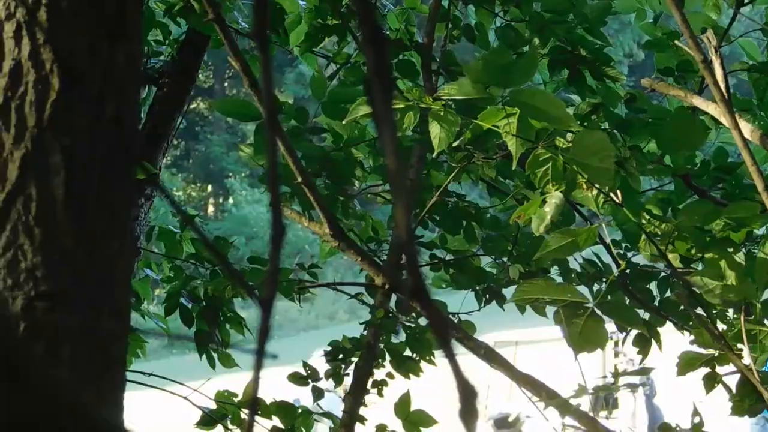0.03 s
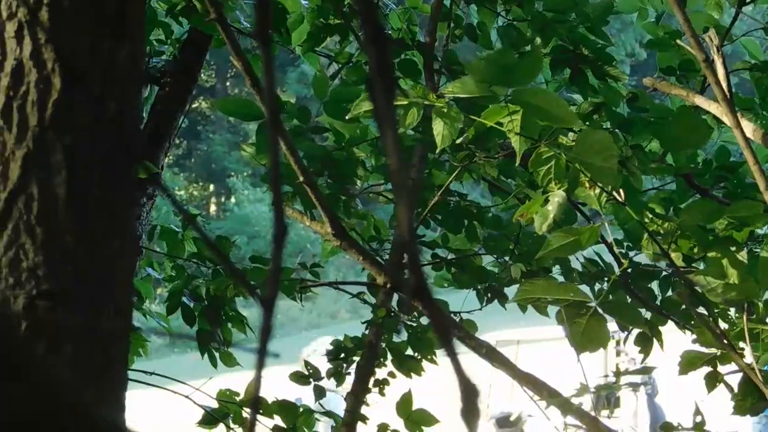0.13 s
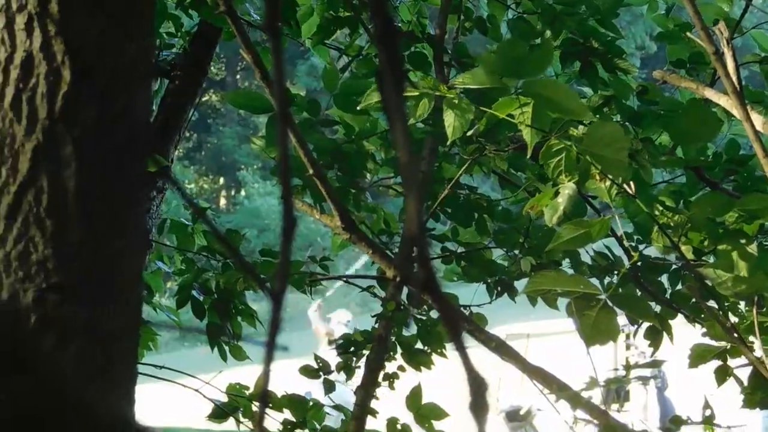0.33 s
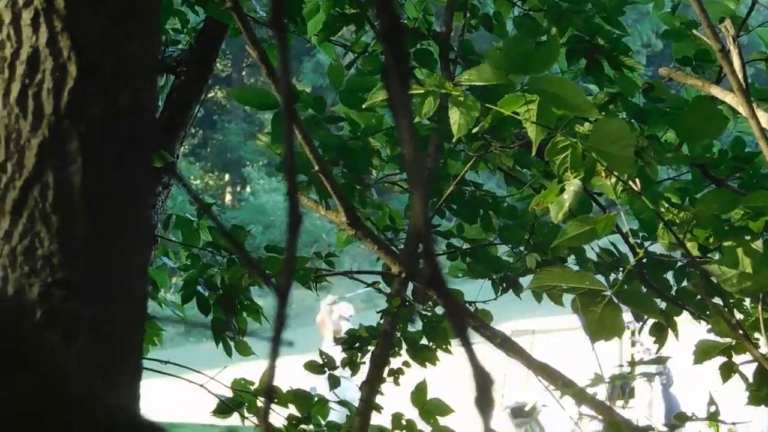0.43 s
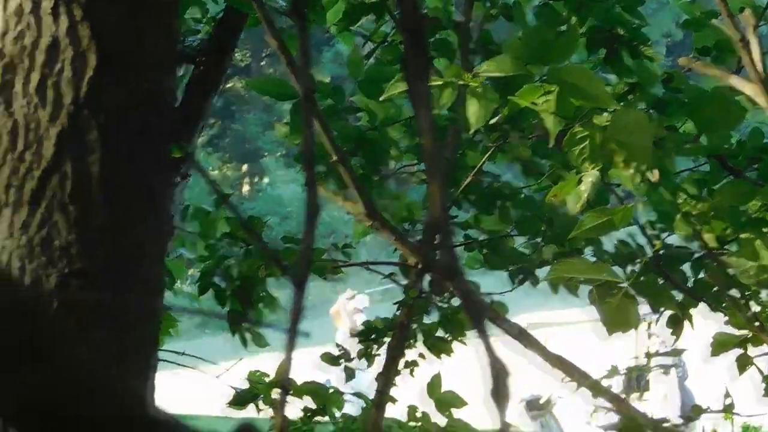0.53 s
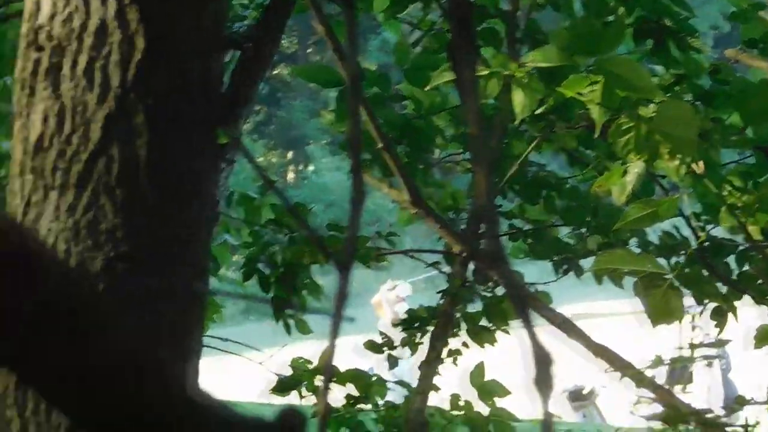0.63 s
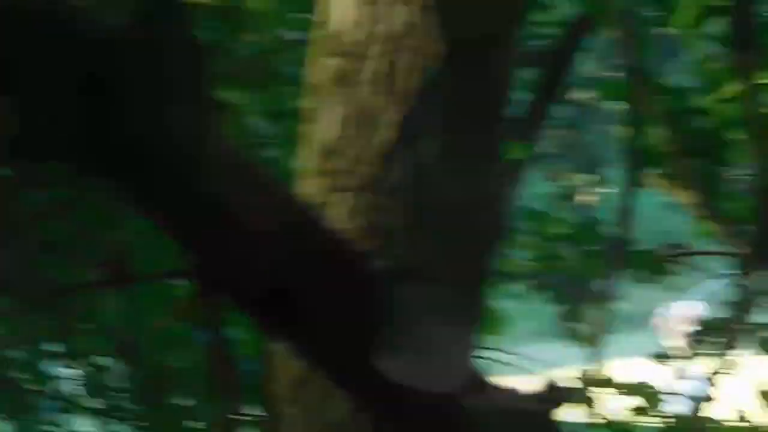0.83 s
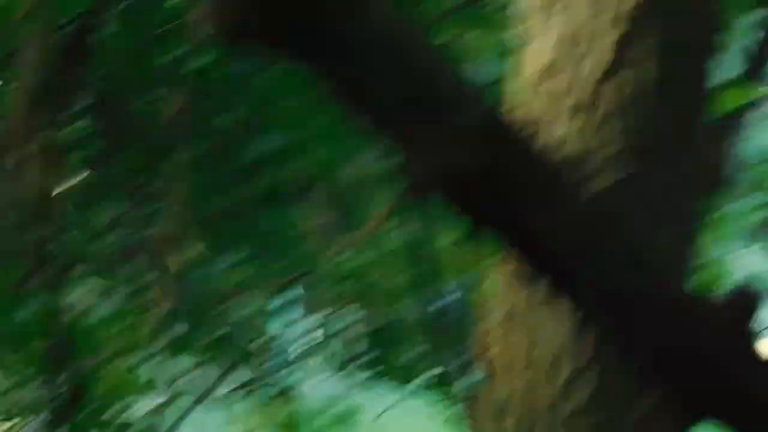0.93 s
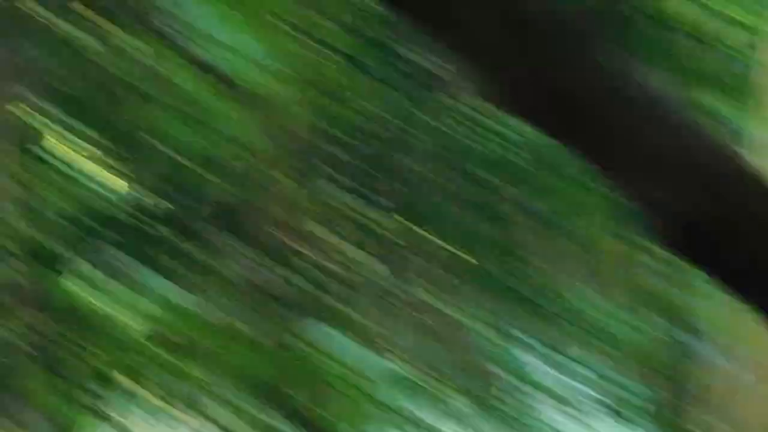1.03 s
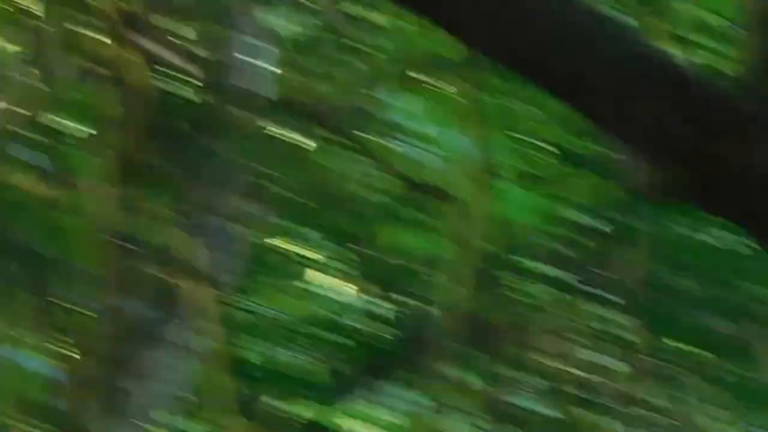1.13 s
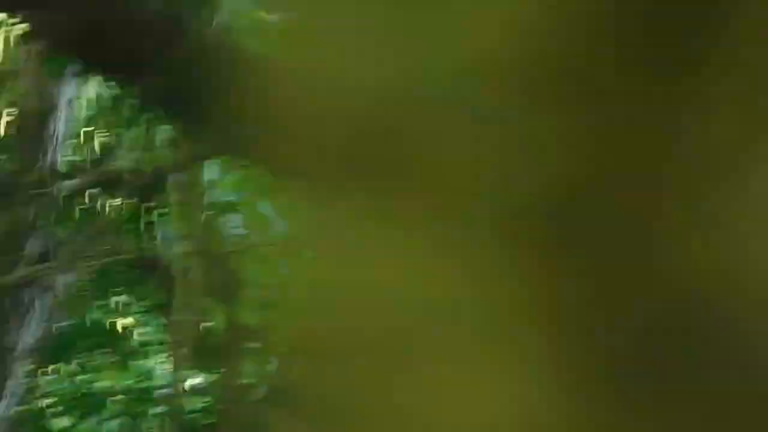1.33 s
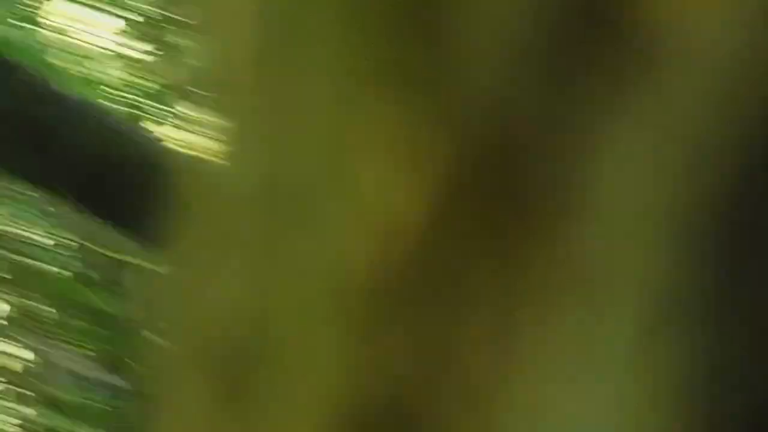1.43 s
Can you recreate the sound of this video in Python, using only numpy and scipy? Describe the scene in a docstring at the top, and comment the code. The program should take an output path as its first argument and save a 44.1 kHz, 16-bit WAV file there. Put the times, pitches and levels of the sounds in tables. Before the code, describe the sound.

One short, brassy air horn blare outdoors, then echoes through the trees and a few handling clicks

```python
"""One blast of a compressed-air horn close to the microphone, in a wood, as a sum of jittered harmonics.
The valve spits, the diaphragm swoops down to its note, turns brassy and sags on release.
Escaping air is coloured noise; the trees return a long ringing tail of filtered, decaying scatter.
Decaying modes make the clicks and bumps in the hand, over a quiet background of air, leaves and a chirp."""
import sys
import numpy as np
from scipy import signal
from scipy.fft import rfft, irfft
from scipy.io import wavfile
from scipy.ndimage import uniform_filter1d

SR = 44100
rng = np.random.default_rng(int(sys.argv[2]) if len(sys.argv) > 2 else 0)


def wav_record(signal):
    """Record a signal, one row per channel, as 16-bit PCM in the file named by sys.argv[1]."""
    frames = np.transpose(np.atleast_2d(signal))
    bounded = np.clip(frames, -1, 1)
    # unit amplitude maps onto the largest positive 16-bit level
    quanta = np.round(bounded * 32767).astype(np.int16)
    wavfile.write(sys.argv[1], SR, quanta)


N = 66150  # samples


def amp(db):
    """Logarithmic level: 20 dB is a tenfold amplitude."""
    return 10 ** (np.asarray(db) / 20)


def seconds():
    """Sampled time: the instant of every sample."""
    return np.arange(N) / SR


def curve(rows):
    """Linear interpolation through (time_s, value) rows."""
    return np.interp(seconds(), *np.array(rows, float).T)


def walk(hz):
    """Band-limited chance: random steps at a rate in Hz, smoothed, with spread near 1."""
    step_samples = max(int(SR / hz), 1)
    steps = rng.standard_normal(N)[(seconds() * hz).astype(int)]
    return uniform_filter1d(steps, step_samples) * np.sqrt(3 / 2)


def noise(colour):
    """Spectral shaping: unrelated left and right noise with (frequency_hz, level_db) colour and rms 1."""
    colour_hz, colour_db = np.array(colour, float).T
    bin_hz = np.arange(N // 2 + 1) * SR / N + 1  # the offset avoids log(0)
    gain = amp(np.interp(np.log(bin_hz), np.log(colour_hz), colour_db))
    shaped = irfft(rfft(rng.standard_normal((2, N))) * gain, N)
    return shaped / shaped.std()


def pan(db):
    """Interaural level difference: left and right gains, left minus right in dB."""
    return amp(np.array([[db], [-db]]) / 2)


def turn(hz):
    """Phase is the running integral of frequency."""
    return 2 * np.pi * np.cumsum(hz) / SR


def fade(age, t60):
    """Exponential decay from age 0, falling 60 dB in t60 seconds."""
    return (age >= 0) * np.exp(-np.log(1000) * np.maximum(age, 0) / t60)


def highpass(x, hz):
    """Second-order filtering that removes the lows."""
    return signal.sosfilt(signal.butter(2, hz, "high", fs=SR, output="sos"), x)


def bandpass(x, order, edges_hz):
    """Band filtering that keeps what lies between two edges."""
    return signal.sosfilt(signal.butter(order, edges_hz, "band", fs=SR, output="sos"), x)


def rumble():
    """Steady low-frequency noise: a stationary random process with a bass-heavy spectrum."""
    # spectrum of the rumble: frequency_hz, level_db
    rumble_colour = [(15, -10), (40, -14), (70, 0), (125, 4.5), (200, -15), (1000, -48)]
    return amp(-63) * noise(rumble_colour)


def outdoor_air():
    """Quiet background: coloured noise under a slow random amplitude modulation."""
    # spectrum of the background: frequency_hz, level_db
    air_colour = [(15, -70), (25, -49.5), (108, -13.5), (394, -4), (516, -2.5), (818, -5), (911, -8.5),
                  (988, -3), (1230, -8), (1650, -5), (2220, -18), (2690, -21), (3620, -29.5), (3920, -31.5),
                  (16000, -41.5)]
    # level of the background before its 1 dB swing: time_s, level_db
    air_level = [(0, -50.5), (.1, -50.5), (.7, -48), (1.25, -47.5), (1.4, -44.5), (1.5, -46.5)]
    return amp(curve(air_level) + walk(15)) * noise(air_colour)


def leaves():
    """Light rustle of leaves: treble-rich noise with a drawn envelope and random modulation."""
    # level of the rustle before its swing: time_s, level_db
    rustle_level = [(.7, -86), (.82, -62), (.865, -56), (.9, -72), (.93, -58), (.97, -78), (1.25, -64),
                    (1.4, -72), (1.465, -57), (1.5, -70)]
    swing_db, swing_hz = 2.5, 57.6
    level = amp(curve(rustle_level) + swing_db * walk(swing_hz))
    return level * noise([(500, -19), (3000, 9.5), (9000, 3), (16000, -4)])


def distant_chirp():
    """Faint far-off chirp: a sine whose frequency and amplitude follow the same half-sine arch."""
    # the one chirp: start_s, length_s, base_hz, arch_hz (added at the middle), level_db, left_minus_right_db
    chirp_row = (1.002, .042, 1480, 220, -46, -7)
    start, length, hz, arch_hz, db, pan_db = chirp_row
    arch = np.sin(np.pi * np.clip((seconds() - start) / length, 0, 1))
    return amp(db) * pan(pan_db) * np.sqrt(2) * arch * np.sin(turn(hz + arch_hz * arch))


def plastic_clicks():
    """Sharp clicks in the hand: modal synthesis of plastic, plus a decaying noise crack."""
    # the clicks: start_s, level_db, left_minus_right_db, crack_db (before it is halved)
    clicks = [(0.7654, -29, -5, -1), (0.7686, -37.5, -23.5, 5.5), (0.7841, -27, -1.5, 7.5),
              (0.805, -37.5, -4, -4), (1.284, -17, -4.5, -3)]
    # vibration modes of the plastic: frequency_hz, level_db, t60_s
    plastic_modes = [(1720, -11, 0.024), (2283, -1, 0.017), (3100, -13.5, 0.016), (5520, -7.5, 0.0049),
                     (8300, -8, 0.0035), (9000, -17, 0.0074), (13200, -16, .004)]
    # spectrum of the crack: frequency_hz, level_db
    crack_colour = [(200, 10), (2000, 1), (6000, -2), (9000, -3.5), (11000, -16), (16000, -17)]
    crack_t60_s, low_cut_hz = 0.011, 870
    out = 0
    for start, db, pan_db, crack_db in clicks:
        age = seconds() - start
        ring = 0
        for hz, mode_db, t60 in plastic_modes:
            offset = rng.uniform(0, 3, (2, 1))
            ring = ring + amp(mode_db) * fade(age, t60) * np.sin(2 * np.pi * hz * age + offset)
        crack = amp(crack_db) / 2 * fade(age, crack_t60_s) * noise(crack_colour)
        out = out + amp(db) * pan(pan_db) * highpass(ring + crack, low_cut_hz)
    return out


def dull_bumps():
    """Dull bumps of the valve and the hand: single damped resonances with a brief linear attack."""
    # the bumps: start_s, level_db, frequency_hz, t60_s, left_minus_right_db
    bumps = [(.131, -18.5, 314, 0.055, -11), (1.142, -38, 383, 0.016, -5), (1.191, -26.5, 756, 0.024, -1),
             (1.489, -26.5, 366, 0.026, -1), (1.49, -23.5, 675, 0.018, -1)]
    attack_s = 0.0034
    out = 0
    for start, db, hz, t60, pan_db in bumps:
        age = seconds() - start
        envelope = np.clip(age / attack_s, 0, 1) * fade(age, t60)
        out = out + amp(db) * pan(pan_db) * envelope * np.sin(2 * np.pi * hz * age)
    return out


def trees(x):
    """Diffuse reverberation: each band convolved with noise in an early and a longer late decay."""
    # scatter by band, levels against the direct band: lower_hz, upper_hz, early_db, early_t60_s, late_db, late_t60_s
    scatter_bands = [(750, 1267, -19, 1, -33, 4.1), (1580, 2215, -13.5, 0.88, -30.5, 2.84),
                     (2630, 3630, -13.5, 0.82, -38, 2.4), (3240, 5600, -24.5, 0.83, -33, 1.38),
                     (5530, 10640, -8, 0.63, -49, 1.9), (11000, 14400, -9.5, 0.38, -46, 1.3)]
    delay_s, build_s = 0.026, 0.042
    age, out = seconds() - delay_s, 0
    build = np.clip(age / build_s, 0, 1)
    for lo_hz, hi_hz, early_db, early_t60, late_db, late_t60 in scatter_bands:
        band = bandpass(x, 4, [lo_hz, hi_hz])
        for db, t60 in ((early_db, early_t60), (late_db, late_t60)):
            response = rng.standard_normal((2, N)) * build * fade(age, t60)
            echo = signal.fftconvolve(band, response, axes=1)[:, :N]
            out = out + amp(db) * band.std() * echo / echo.std(axis=1, keepdims=True)
    return out


def echoes(x):
    """Discrete reflection off the edges of the wood: delayed, band-limited and smeared by foliage."""
    # the returns: delay_s, level_db, left_minus_right_db, centre_hz
    returns = [(0.099, -11.5, 1.5, 3120), (.14, -19.5, 10, 960), (.265, -18, -5.5, 1930),
               (.4, -29, -1.5, 2260), (.57, -30.5, 2, 1350), (.73, -34, -1.5, 935), (.735, -43, -6, 3140)]
    width_octaves, smear_t60_s, roughness = 0.77, 0.051, 0.39
    out = 0
    for delay, db, pan_db, hz in returns:
        smear = rng.standard_normal((2, N)) * fade(seconds() - delay, smear_t60_s)
        path = roughness * smear / np.linalg.norm(smear[0])
        path[:, int(delay * SR)] += 1  # the clean reflection
        band = bandpass(x, 2, hz * 2 ** (np.array([-.5, .5]) * width_octaves))
        out = out + amp(db) * pan(pan_db) * signal.fftconvolve(band, path, axes=1)[:, :N]
    return out


def wood(tone, hiss):
    """Superposed reflections: scatter and echoes of the blast, wavering as the leaves move."""
    far = tone + highpass(hiss, 2500)  # of the hiss only the treble carries far
    # the distinct echoes carry mainly the note at full pressure
    carry_from_s, carry_until_s, carry_ramp_s, weak_db = .13, 0.469, .04, -9
    before = 1 - (seconds() - carry_from_s) / carry_ramp_s
    after = (seconds() - carry_until_s) / carry_ramp_s
    carry = amp(weak_db * np.clip(np.maximum(before, after), 0, 1))
    waver_db, waver_hz = 2, 35
    waver = amp(waver_db * np.array([walk(waver_hz), walk(waver_hz)]))
    return waver * (trees(far) + echoes(carry * far))


def puff():
    """Soft low thud as the first gust of air arrives: low noise under a Gaussian pulse."""
    # the gust: centre_s, half_length_s (to 1/e), level_db
    gust = (0.172, .017, -20)
    # spectrum of the gust: frequency_hz, level_db
    gust_colour = [(12, 8), (30, 4), (70, 5), (130, -36), (330, -17), (700, -36), (4000, -70)]
    centre, half_length, db = gust
    return amp(db) * np.exp(-((seconds() - centre) / half_length) ** 2) * noise(gust_colour)


def buffet():
    """Low turbulence at full flow: bass noise with exponential edges while the valve is wide open."""
    # spectrum of the buffeting: frequency_hz, level_db
    buffet_colour = [(15, 10), (30, 10.5), (50, 4.5), (150, 2), (600, 4), (1100, -5), (2500, -27),
                     (16000, -75)]
    open_s, close_s, fade_s = .134, 0.5, 0.0092
    t = seconds()
    outside = np.maximum(2 * (open_s - t), 0) + np.maximum(t - close_s, 0)  # rises twice as fast as it falls
    return amp(-27) * np.exp(-outside / fade_s) * noise(buffet_colour)


def jet():
    """Hiss of the escaping air: jet turbulence as broadband noise that follows the flow."""
    # level of the jet, relative: time_s, level_db
    jet_level = [(.078, -42), (.087, -13), (.104, 0), (.114, -7.5), (.128, -11.5), (.145, 3.5), (.2, -1),
                 (.46, 2.5), (.497, -3), (.52, -45), (.56, -73)]
    # spectrum of the jet: frequency_hz, level_db
    jet_colour = [(30, -17), (700, -18.5), (1300, 1.5), (2600, -2.5), (4500, -3), (8000, -7.5),
                  (13000, -20.5), (16000, -20)]
    jet_db = -25
    return amp(jet_db + curve(jet_level)) * noise(jet_colour)


def squeals():
    """Short, mostly falling whistles while the pressure builds: jittered sine glides in half-sine arches."""
    # the whistles: start_s, length_s, from_hz, to_hz, level_db
    whistles = [(0.081, .02, 5300, 3900, -40), (0.098, 0.023, 5950, 5720, -34.5),
                (0.103, 0.0307, 2620, 2365, -25.5), (0.13, 0.022, 2380, 2250, -18),
                (0.137, 0.022, 1320, 1280, -23.5), (0.14, 0.0225, 6400, 5930, -22.5),
                (0.133, 0.025, 6650, 6660, -31)]
    out = 0
    for start, length, from_hz, to_hz, db in whistles:
        progress = np.clip((seconds() - start) / length, 0, 1)
        hz = (from_hz + (to_hz - from_hz) * progress) * (1 + 0.013 * walk(1100))
        out = out + amp(db) * np.sin(np.pi * progress) * np.sin(turn(hz))
    return out


def horn():
    """Forced diaphragm vibration: harmonics that grow with pressure, and a weak inharmonic second mode."""
    # centre of the jittered diaphragm pitch: time_s, pitch_hz
    diaphragm_pitch = [(.085, 2050), (.095, 1580), (.109, 1260), (.119, 1120), (.143, 965), (.155, 938),
                       (.173, 998), (.205, 997), (.26, 1008), (.35, 1004.5), (.47, 1004), (.5, 962),
                       (.53, 952)]
    # level of the whole tone, relative: time_s, level_db
    blow_level = [(.08, -65), (.089, -23.5), (.103, -21), (.111, -5.5), (.134, 3), (.17, 2.5), (.207, -1.5),
                  (.25, 0), (.46, 0), (.494, 2)]
    # level of the overtones against the fundamental, relative: time_s, level_db
    brass_level = [(.09, -7), (.115, -30), (.135, -12.5), (.155, -8), (.178, 0.5), (.21, 3.5), (.47, 0),
                   (.497, -7.5), (.515, -45)]
    # harmonics in order from the fundamental: left_db, right_db
    harmonics = [(-13, -9), (-14, -17), (-18.5, -26), (-21, -24.5), (-34.5, -35.5), (-33.5, -40.5),
                 (-36, -38), (-35.5, -37), (-40, -37.5), (-36, -39), (-35, -44), (-36, -43), (-43, -37),
                 (-39.5, -54), (-43, -51)]
    release_db_per_s = 260  # extra fall after the last blow point
    second_hz, second_jitter, second_db, sideband_db = 2425, 0.0484, -34.5, -47
    jitter, jitter_hz, wander, wander_hz = .0045, 1100, .0012, 39.6  # as fractions of the pitch
    wobble_rad, wobble_hz = 0.043, 1000  # cycle-to-cycle scatter of timing
    flutter_db, flutter_hz = 4, 109.75  # reached by the top harmonic; the low ones are steadier
    port_lag_s = 0.0001307  # the left microphone port hears the horn later

    hz = curve(diaphragm_pitch) * (1 + jitter * walk(jitter_hz) + wander * walk(wander_hz))
    lag = 2 * np.pi * hz * port_lag_s * np.array([[1], [0]])
    phase = turn(hz) + wobble_rad * walk(wobble_hz) - lag
    since_release = np.maximum(seconds() - blow_level[-1][0], 0)
    blow = amp(curve(blow_level) - release_db_per_s * since_release)
    brass = amp(curve(brass_level))
    second = turn(second_hz * (1 + second_jitter * walk(600)))

    out = amp(harmonics[0])[:, None] * np.sin(phase)
    out = out + brass * amp(second_db) * np.sin(second + rng.uniform(0, np.pi, (2, 1)))
    for k, sides_db in enumerate(harmonics[1:], 2):
        swing = np.array([walk(flutter_hz), walk(flutter_hz)])
        flutter = amp(flutter_db * k / len(harmonics) * swing)
        offset = rng.uniform(0, 2 * np.pi)
        overtone = amp(sides_db)[:, None] * flutter * np.sin(k * phase + offset)
        # the first vibration chops the second: sum frequencies
        sideband = amp(sideband_db) * np.sin(second + k * phase + offset) * (k <= 10)
        out = out + brass * (overtone + sideband) * (k * hz < SR / 2)
    return np.sqrt(2) * blow * out


def scene():
    """Superposition of the blast, its reflections and the small sounds around it."""
    tone = horn() + squeals()
    hiss = jet()
    background = outdoor_air() + leaves() + distant_chirp() + rumble()
    handling = plastic_clicks() + dull_bumps()
    return tone + hiss + wood(tone, hiss) + buffet() + puff() + handling + background


def record(dry):
    """Saturation and band limiting: the recorder rounds the highest peaks and cuts the top."""
    ceiling, top_hz = .88, 16000
    rounded = dry / (1 + (dry / ceiling) ** 8) ** (1 / 8)
    return signal.sosfilt(signal.ellip(8, .2, 70, top_hz, fs=SR, output="sos"), rounded)


dry = scene()
out = record(dry)
wav_record(out)
```